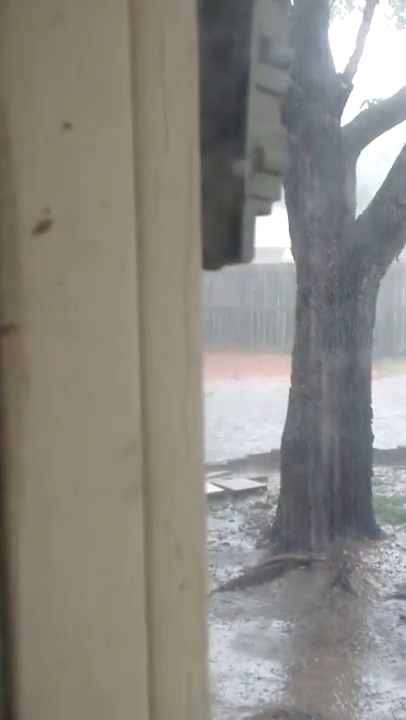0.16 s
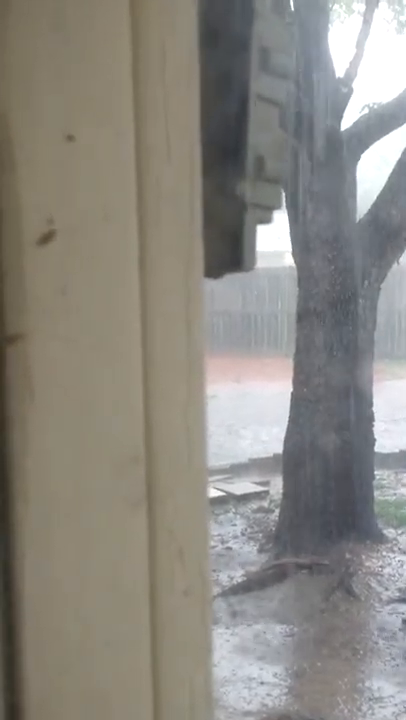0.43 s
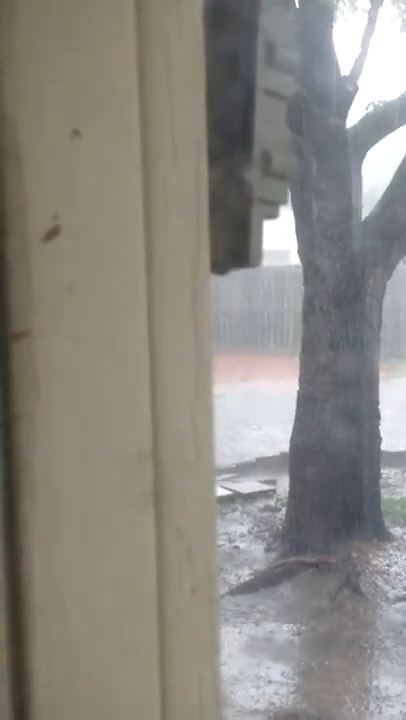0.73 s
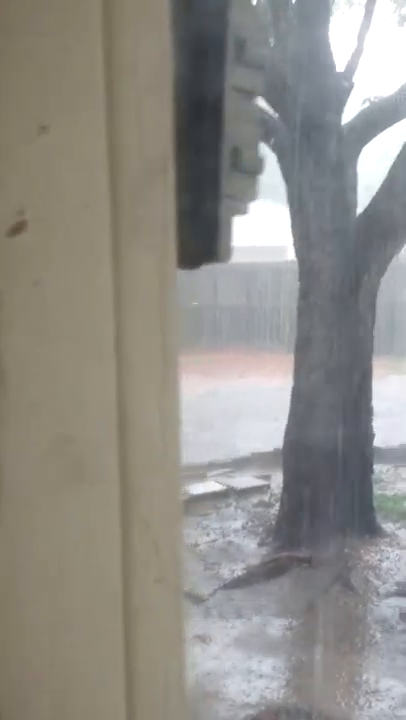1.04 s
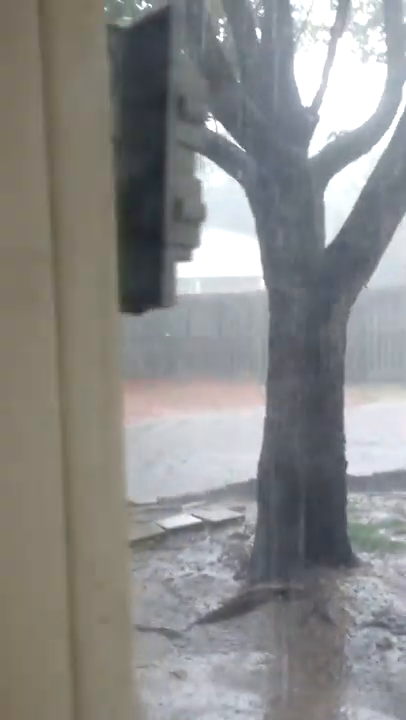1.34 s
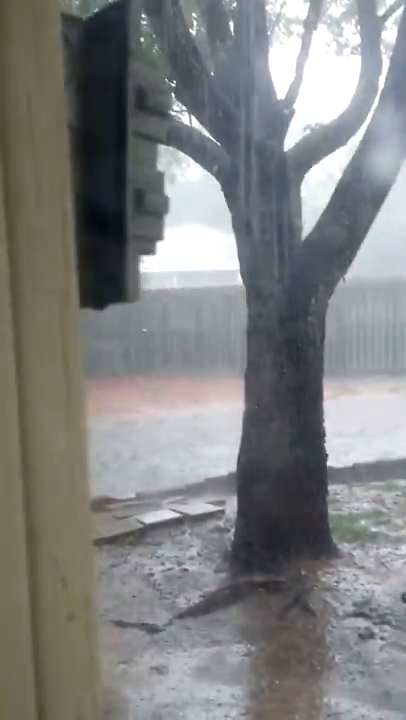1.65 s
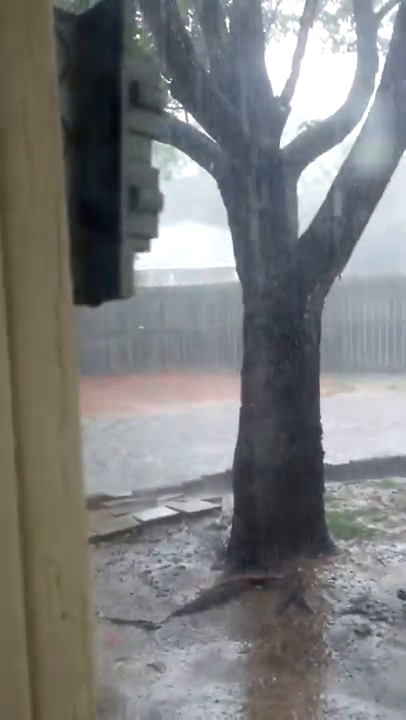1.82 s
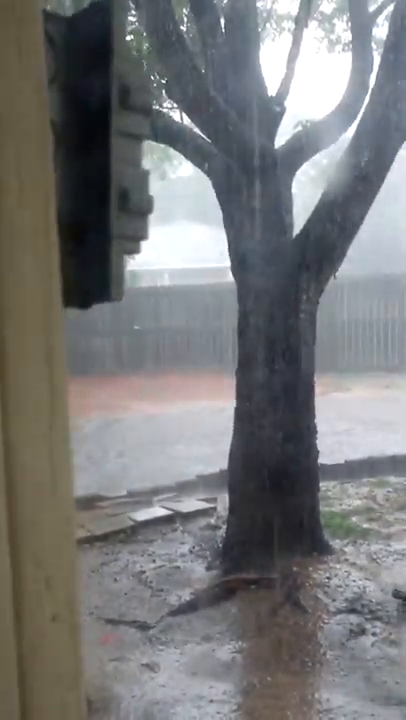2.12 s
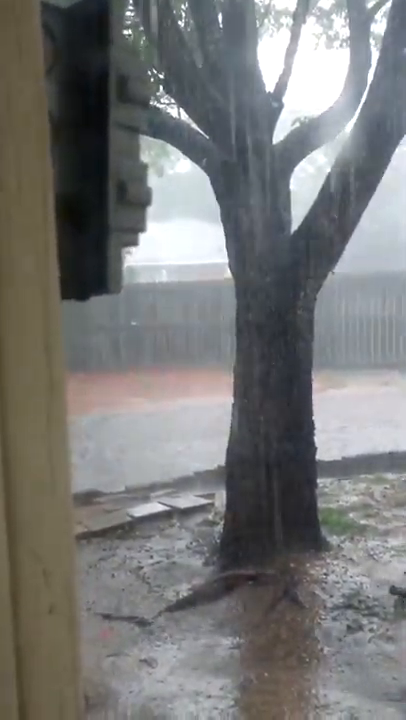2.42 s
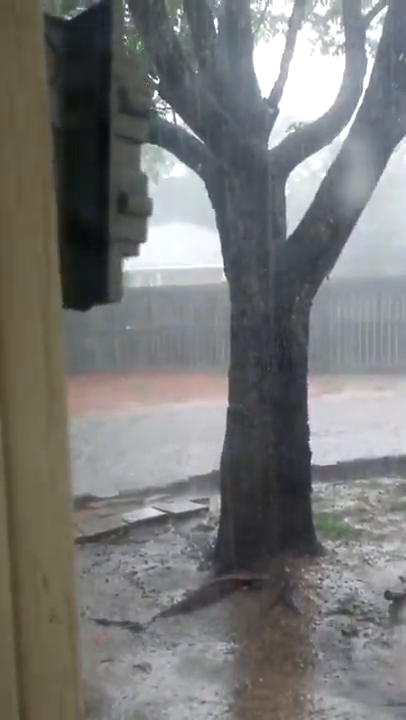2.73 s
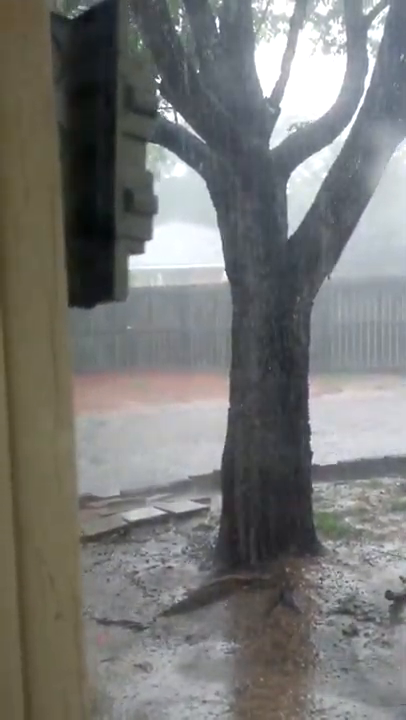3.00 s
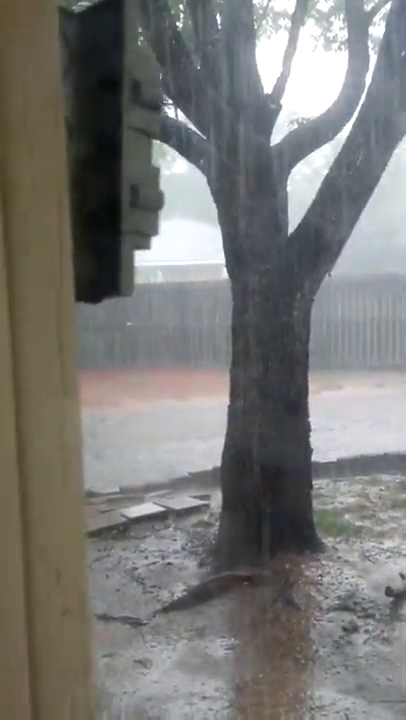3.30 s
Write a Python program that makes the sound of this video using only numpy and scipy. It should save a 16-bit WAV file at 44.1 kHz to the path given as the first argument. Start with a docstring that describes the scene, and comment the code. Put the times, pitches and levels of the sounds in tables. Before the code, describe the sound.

Heavy rain pours at a nearly constant level for about 3.5 seconds, a wide, lightly flickering hiss with dense, crisp patter in puddles. Larger drips plink irregularly, high and low, clustering around 0.7-0.9 and 2.8-2.9 seconds, with very short close echoes. Small bright splashes come near 0.7-0.8 and 2.1 seconds. A faint, low, hollow pipe-like drone wavers underneath. Phone stereo from a porch.

```python
"""Heavy rain on a muddy yard, heard from a porch through a phone with a microphone at each end.
The rain is a wide wash of shaped noise plus a dense patter of short blips for near drops.
A few big drips ring as fading sines with softer echoes; splashes are short bursts of band noise.
Behind them is a pipe-like drone of narrow, slowly varying resonances.
The phone makes its stereo by subtracting each microphone, delayed, from the other."""
import sys
import numpy as np
from scipy import signal
from scipy.fft import rfft, irfft, next_fast_len
from scipy.io import wavfile
from scipy.ndimage import uniform_filter1d

SR = 44100
rng = np.random.default_rng(int(sys.argv[2]) if len(sys.argv) > 2 else 0)


def invert_db(x):
    """Field ratio 10**(x/20) for x, a level in decibels (scalar or array-like)."""
    u = np.asarray(x, float) / 20
    return 10 ** u


def wav_record(signal):
    """Record a signal, one row per channel, as 16-bit PCM in the file named by sys.argv[1]."""
    frames = np.transpose(np.atleast_2d(signal))
    bounded = np.clip(frames, -1, 1)
    # unit amplitude maps onto the largest positive 16-bit level
    quanta = np.round(bounded * 32767).astype(np.int16)
    wavfile.write(sys.argv[1], SR, quanta)


N = 152586


def evened(x):
    """Scales to rms 1."""
    return x / np.sqrt(np.mean(x ** 2) + 1e-20)


def read(points, hz, col=1):
    """Reads a table column on a log-frequency axis."""
    p = np.transpose(points)
    return np.interp(np.log(hz + 1), np.log(p[0] + 1), p[col])


def curve(points):
    """Reads a (time, level) table at every sample."""
    return np.interp(np.arange(N) / SR, *np.transpose(points))


def add(mix, start_s, sound):
    """Mixes a sound in at a time, cut at the end of the mix."""
    part = mix[round(start_s * SR):][:len(sound)]
    part += sound[:len(part)]


def wobble(t, low_hz, high_hz, count):
    """Sum of log-spaced sines with random phase, rms 1."""
    rates_hz = np.geomspace(low_hz, high_hz, count)
    return evened(sum(np.sin(2 * np.pi * (f * t + rng.random())) for f in rates_hz))


# Body shadow, upper re lower microphone: (frequency [Hz], level [dB])
SHADOW_UPPER = [(100, 0.2), (400, 2.5), (1000, -2.5), (2500, -1.5), (4000, 2), (6000, -1), (7500, -5.5),
                (10000, -4), (12500, -10.5), (14200, -3.5)]
GROUND_LAG_S = 0.0003515  # travel time along the phone


def upper(hz, along=0.98):
    """Path to the upper microphone: shadow, and a lag scaled by along (negative = early)."""
    return invert_db(read(SHADOW_UPPER, hz)) * np.exp(-2j * np.pi * hz * along * GROUND_LAG_S)


def arrive(x, along=0.89):
    """One source at the upper and lower microphone."""
    size = next_fast_len(N + 64)
    hz = np.fft.rfftfreq(size, 1 / SR)
    return np.array([irfft(rfft(x, size) * upper(hz, along), size)[:N], x])


# Pipe-like resonances: (frequency [Hz], pole bandwidth [Hz], rms before swell [dB],
# share of swell followed [0-1], steady part re random part [ratio])
DRONE_MODES = [(201.3, 13, -41.5, 0.084, 0.77), (403.6, 4, -46, 0.95, 3), (151, 13, -47, 0, 0.5),
               (270.2, 20, -49.5, 0.25, 0), (316.6, 14, -53.5, 0.66, 0), (373, 20, -52, 0.16, 0),
               (463.4, 52, -53.5, 0.11, 0)]
# Drone swell, used relative to its mean: (time [s], level [dB])
DRONE_SWELL = [(0.0, -46), (0.13, -39.5), (0.22, -60), (0.3, -44.5), (0.53, -65), (0.6, -38), (0.85, -53.5),
               (0.88, -47.5), (1.39, -46), (1.46, -61), (1.54, -42), (1.78, -51), (1.84, -40.5),
               (2.08, -38.5), (2.15, -57), (2.25, -35.5), (2.39, -54.5), (2.76, -43.5), (2.83, -53),
               (3.02, -40.5), (3.37, -42.5), (3.46, -54)]
DRONE_WANDER = 0.006  # rms pitch drift, share of frequency


def drone():
    """Running water excites pipe-like resonances: the two loudest an octave apart, drifting together."""
    x, t = np.zeros(N), np.arange(N) / SR
    level_db = curve(DRONE_SWELL)
    swell_db = level_db - level_db.mean()
    drift = wobble(t, 0.4, 3, 12)
    warped_s = np.cumsum(1 + DRONE_WANDER * drift) / SR
    for hz, width_hz, db, follows, steady in DRONE_MODES:
        r = np.exp(-np.pi * width_hz / SR)
        noise = [1, 1j] @ rng.standard_normal((2, N + SR))
        slow = signal.lfilter([1], [1, -2 * r, r * r], noise)[SR:]  # drops the filter's 1 s run-in
        envelope = steady + slow / np.std(slow)
        tone = evened((envelope * np.exp(2j * np.pi * hz * warped_s)).real)
        x += invert_db(db + follows * swell_db) * tone
    return arrive(x, 0.25)


DRIP_ALONG = 0.067  # lag share, drips and splashes

# Splashes: (time [s], noise rms before envelope [dB], fall to 1/e [s])
SPLASH_HITS = [(0.703, -33.5, .02), (0.743, -32.5, 0.026), (0.79, -35, 0.034), (2.072, -25.5, 0.0085),
               (2.085, -44, 0.0097), (2.139, -32, .012)]
SPLASH_LOW_HZ, SPLASH_HIGH_HZ = 5200, 8250


def splashes():
    """Short bright bursts: band noise with a fast rise and Gaussian fall."""
    x, t = np.zeros(N), np.arange(1500) / SR
    band = signal.butter(2, [SPLASH_LOW_HZ, SPLASH_HIGH_HZ], "band", fs=SR, output="sos")
    noises = rng.standard_normal((len(SPLASH_HITS), 1500))
    for (start_s, db, length_s), noise in zip(SPLASH_HITS, noises):
        shape = np.minimum(t / 0.0011, 1) * np.exp(-(t / length_s) ** 2)
        add(x, start_s, invert_db(db) * shape * evened(signal.sosfilt(band, noise)))
    return arrive(x, DRIP_ALONG)


# Big drips and one later echo (the row at 2.8982 s is a softer second echo of the drip at 2.8935 s):
# (time [s], level before DRIP_DB [dB], pitch [Hz], delay of the softer repeat [ms])
DRIP_HITS = [(0.1068, -7, 4170, 6), (0.2054, -9, 6450, 6), (0.2902, -13, 3740, 7), (0.388, -11, 2000, 6),
             (0.7055, -8, 3520, 6), (0.8470, -5.5, 4100, 10.5), (0.9033, -15, 4400, 6),
             (0.9182, -6, 3560, 8.5), (1.0439, -12.5, 1810, 6), (1.3364, -9, 3800, 6),
             (1.391, -12, 1850, 6), (1.4691, -16, 4420, 7), (1.5788, -14, 3520, 7), (1.644, -12.5, 1930, 6),
             (1.658, -7, 4320, 7), (1.7044, -20, 1890, 6), (1.9512, -10.5, 3730, 6), (2.1432, -20, 1650, 6),
             (2.1898, -21.5, 1720, 12), (2.3107, -8, 1850, 6.5), (2.329, -16, 1860, 4.75),
             (2.3310, -20, 1140, 4.4), (2.803, -11.5, 4200, 6), (2.827, -6, 4170, 7),
             (2.8935, -4.5, 1820, 7.3), (2.8982, -14, 1900, 13), (3.028, -19, 1670, 6),
             (3.04, -24, 4400, 6), (3.2794, -17, 2070, 6)]
DRIP_DB, ECHO_DB, DRIP_RISE_S = -10, -6, 0.0013
DRIP_CYCLES, DRIP_TAIL_CYCLES, DRIP_TAIL_SHARE = 3.6, 14, 0.15  # cycles to 1/e


def drips():
    """Sines with a short plop and a fainter, longer ring; the porch wall returns softer echoes."""
    x, t = np.zeros(N), np.arange(1500) / SR
    for start_s, db, hz, echo_ms in DRIP_HITS:
        plop = np.exp(-(t * hz / DRIP_CYCLES) ** 2)
        tail = DRIP_TAIL_SHARE * np.exp(-(t * hz / DRIP_TAIL_CYCLES) ** 2)
        envelope = (plop + tail) * np.minimum(t / DRIP_RISE_S, 1)
        ring = invert_db(db + DRIP_DB) * envelope * np.sin(2 * np.pi * hz * t)
        add(x, start_s, ring)
        add(x, start_s + echo_ms / 1000, invert_db(ECHO_DB) * ring)
    return arrive(x, DRIP_ALONG)


PATTER_DB, PATTER_LOW_HZ, PATTER_HIGH_HZ = -39, 1750, 11360  # rms before rainfall; pitch range
PATTER_PER_S, PATTER_SPREAD_DB = 1000, 4.5  # drops over all pitches and directions; size spread
PATTER_TILT, PATTER_CYCLES = 0.8, 1.5  # exponent of pitch; cycles to 1/e


def patter():
    """Near drops in the puddles: short blips of rising pitch, random in time and size, a few large."""
    out, t = np.zeros((2, N)), np.arange(600) / SR
    for along in (1., .2, -.15):
        x = np.zeros(N)
        pitches_hz = np.geomspace(PATTER_LOW_HZ, PATTER_HIGH_HZ, 12) * rng.uniform(0.958, 1.057, 12)
        for hz in pitches_hz:
            u = t * hz / PATTER_CYCLES
            envelope = np.minimum(5 * u, 1) * np.exp(-u)
            chirp = np.sin(2 * np.pi * hz * t * (1 + 0.006 * u))
            blip = envelope * chirp * (hz / 4000) ** PATTER_TILT
            sizes = invert_db(PATTER_SPREAD_DB * np.minimum(rng.exponential(1, N), 4))
            hits = sizes * (rng.random(N) < PATTER_PER_S / 36 / SR)  # 12 pitches x 3 directions
            x += invert_db(read(WASH_SPECTRUM, hz)) * signal.oaconvolve(hits, blip)[:N]
        out += arrive(x, along)
    return invert_db(PATTER_DB) * evened(out)


# Rain spectrum, relative; also weights the patter pitches: (frequency [Hz], density [dB per Hz])
WASH_SPECTRUM = [(20, 7.5), (30, 14), (45, -7), (90, -1.5), (150, -1.5), (300, -1), (430, -8.5),
                 (520, -10.5), (700, -12), (1250, -11), (1600, -8), (1880, -0.5), (2200, -13), (2600, -7.5),
                 (3000, -9), (3600, -7), (3900, -10), (4400, -7.5), (5100, -10), (6300, -6.5), (7600, -8.5),
                 (9300, -16.5), (10600, -14), (11300, -17), (12600, -14), (13500, -17.5)]
# Shares of wash power:
# (frequency [Hz], from the ground in front [0-1], unrelated at each microphone [0-1])
WASH_SHARES = [(100, 0.18, 0.02), (1000, 0, 0), (2020, 0.08, 0.06), (3060, 0.03, 0.17), (5560, 0.21, 0.14),
               (8700, 0.5, 0.7), (14000, 0.13, 0.35)]
WASH_DB = -29.5  # rms before rainfall
SWELL_DB, PATCH_DB, FLICKER_DB = 0.41, 0.71, 1.14  # rms; swell and flicker reduced below 1500 Hz
SPACING_M = 0.17  # between microphones


def wash():
    """Countless far drops: noise from the ground and all round, with patches, flicker and swell."""
    frames, hz = N // 128 + 5, np.fft.rfftfreq(512, 1 / SR)[:, None]
    draw = rng.standard_normal((frames, 257, 11)).T
    front, round_a, round_b, loose_low, loose_up = draw[0:10:2] + 1j * draw[1:10:2]

    # patches: narrow in frequency, slow; flicker: wide in frequency, fast
    patches = evened(uniform_filter1d(uniform_filter1d(draw[10], 8, 0), 20, 1))
    flicker = evened(uniform_filter1d(uniform_filter1d(draw[10], 120, 0), 4, 1))
    swell = wobble(np.arange(frames) * 128 / SR, 3, 30, 24)

    ground = np.clip(read(WASH_SHARES, hz), 0, 1)
    loose = np.clip(read(WASH_SHARES, hz, col=2), 0, 1 - ground)
    around = np.sqrt(1 - ground - loose)
    same = np.sinc(2 * hz * SPACING_M / 343)  # diffuse-field coherence
    from_ground = np.sqrt(ground) * front
    low = from_ground + around * round_a + np.sqrt(loose) * loose_low
    round_up = around * (same * round_a + np.sqrt(1 - same ** 2) * round_b)
    shade = invert_db(read(SHADOW_UPPER, hz))
    up = from_ground * upper(hz) + shade * (round_up + np.sqrt(loose) * loose_up)

    lively = np.clip(hz / 1500, 0, 1)  # smoother bass
    motion_db = PATCH_DB * patches + lively * (FLICKER_DB * flicker + SWELL_DB * swell)
    z = np.array([up, low]) * invert_db(read(WASH_SPECTRUM, hz) + motion_db)
    noise = signal.istft(z, nperseg=512, noverlap=384)[1][:, :N]
    return invert_db(WASH_DB) * evened(noise)


# Rainfall, used relative to its mean: (time [s], level [dB])
RAIN_LEVEL = [(0.0, -37), (0.95, -37), (1.16, -37.5), (1.39, -36.5), (3.44, -37), (3.46, -36)]


def scene():
    """Wash and patter follow the rainfall; drips, splashes and drone do not."""
    rain_db = curve(RAIN_LEVEL)
    rain = (wash() + patter()) * invert_db(rain_db - rain_db.mean())
    return rain + drips() + splashes() + drone()


# Treble cut near the top: (frequency [Hz], level [dB])
TOP_CUT = [(13500, 0), (14100, -5), (14600, -3), (15200, -6)]
# Subtraction of the other microphone: (frequency [Hz], share [0-1], delay [ms])
MIC_BEAM = [(100, .9, .385), (1300, .92, .380), (2600, .87, .382), (4000, .72, .374), (5250, .58, .381),
            (6500, .45, .365), (8500, .38, .351), (10000, .3, .349), (14000, .25, .349)]


def low_pass(x):
    """Removes everything above the highest recorded frequency."""
    return signal.sosfilt(signal.butter(12, 15250, fs=SR, output="sos"), x)


def record(dry):
    """Treble cut near the top, then each microphone minus a delayed share of the other."""
    size = next_fast_len(N + 64)
    hz = np.fft.rfftfreq(size, 1 / SR)
    mics = rfft(dry, size) * invert_db(read(TOP_CUT, hz))
    share = np.clip(read(MIC_BEAM, hz), 0, .97)
    delay_s = read(MIC_BEAM, hz, col=2) / 1000
    stereo = mics - share * np.exp(-2j * np.pi * hz * delay_s) * mics[::-1]
    mix = irfft(stereo, size)[:, :N]
    return low_pass(mix)


dry = scene()
out = record(dry)
wav_record(out)
```